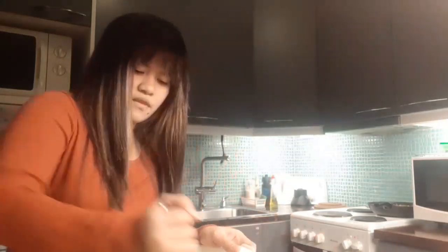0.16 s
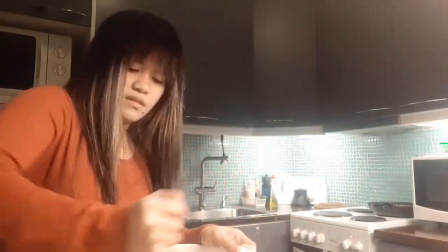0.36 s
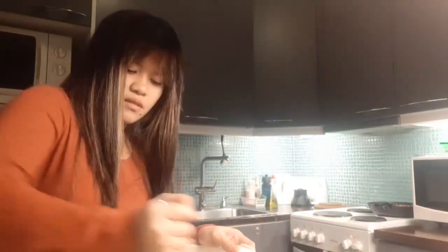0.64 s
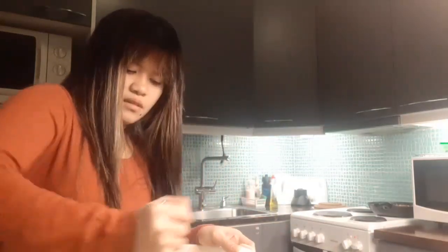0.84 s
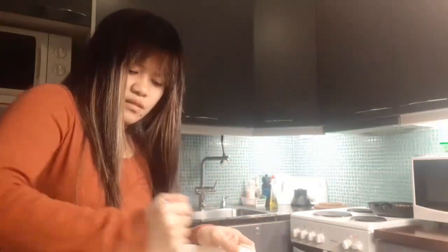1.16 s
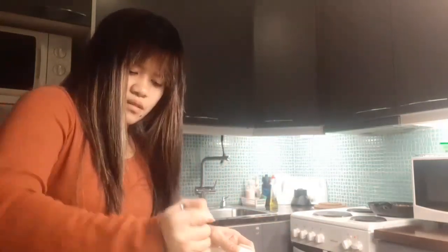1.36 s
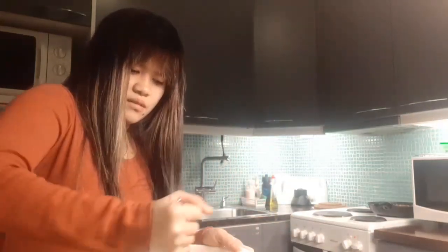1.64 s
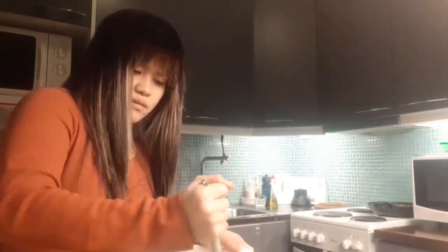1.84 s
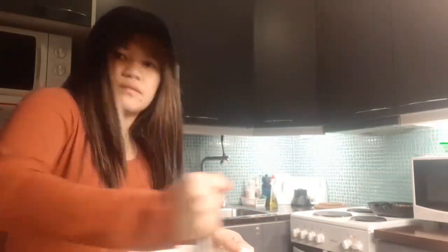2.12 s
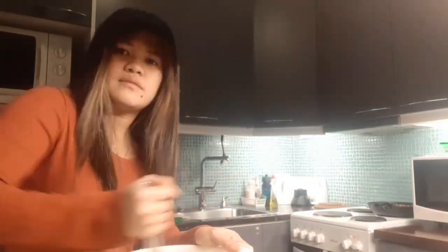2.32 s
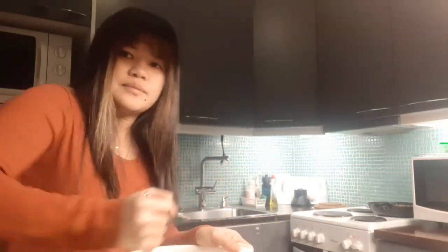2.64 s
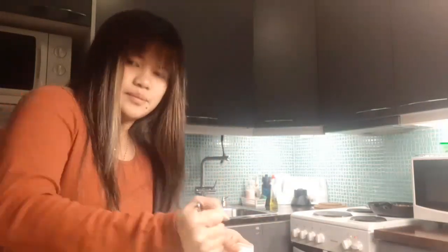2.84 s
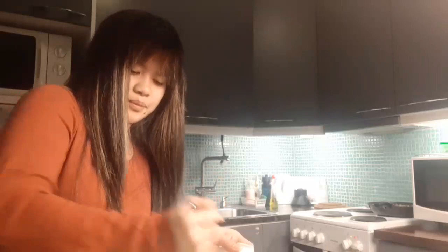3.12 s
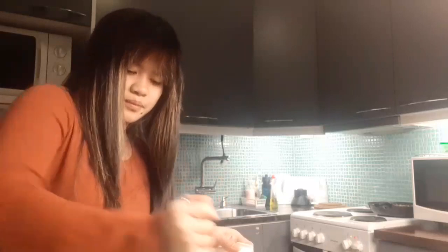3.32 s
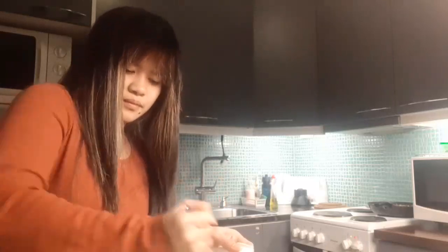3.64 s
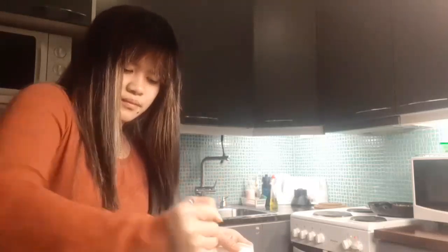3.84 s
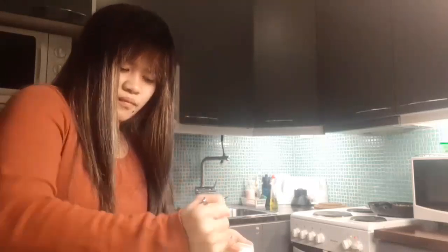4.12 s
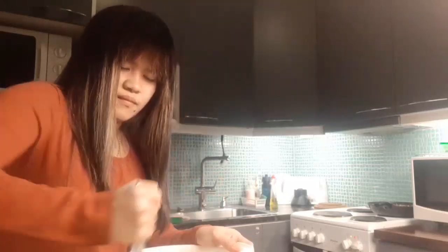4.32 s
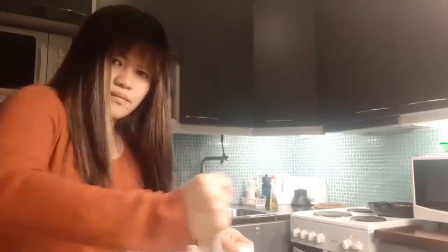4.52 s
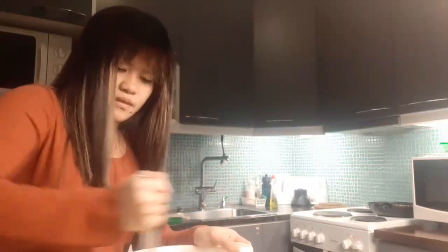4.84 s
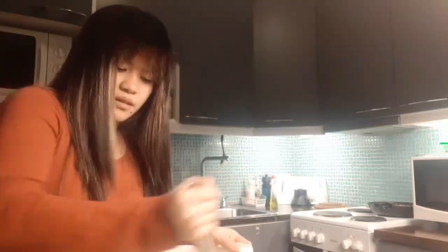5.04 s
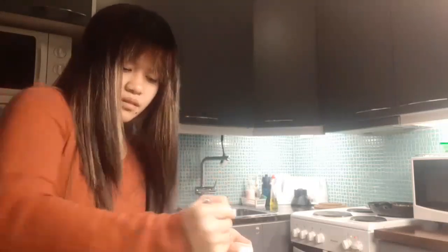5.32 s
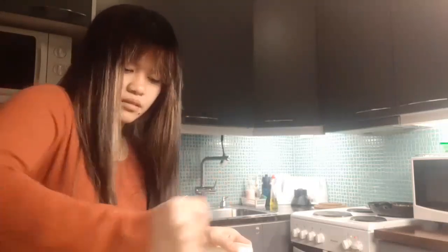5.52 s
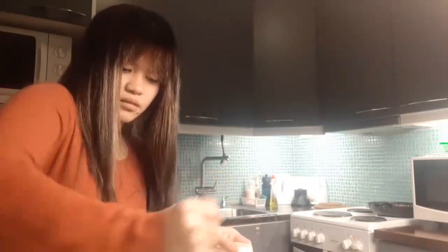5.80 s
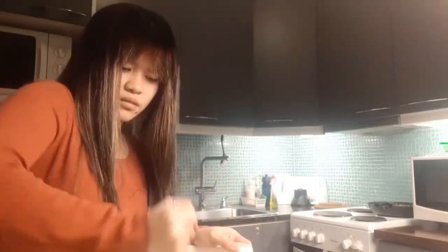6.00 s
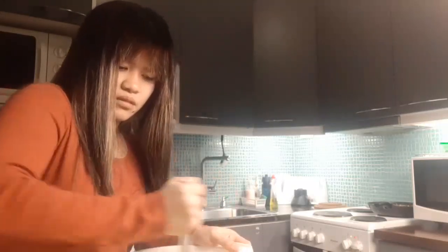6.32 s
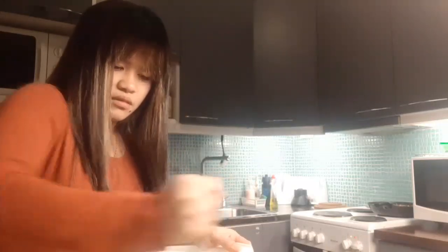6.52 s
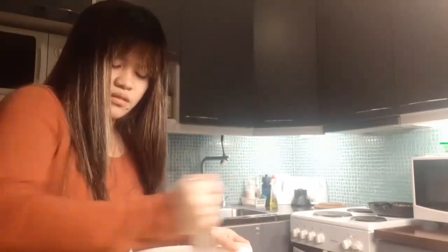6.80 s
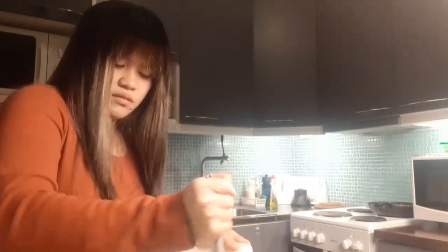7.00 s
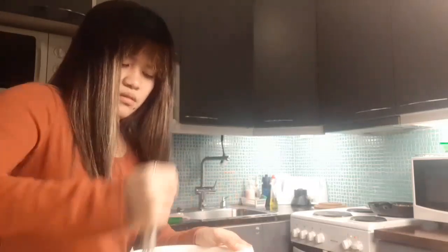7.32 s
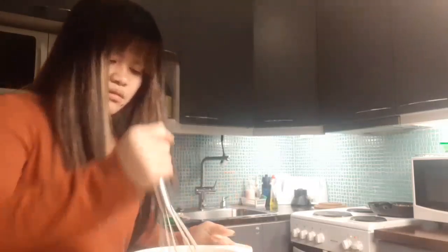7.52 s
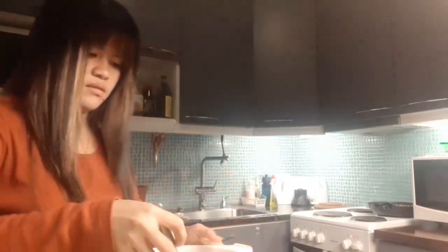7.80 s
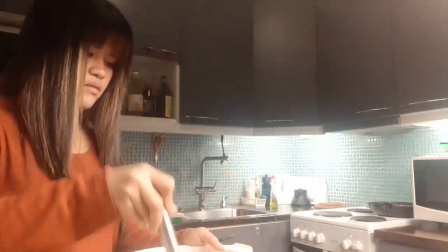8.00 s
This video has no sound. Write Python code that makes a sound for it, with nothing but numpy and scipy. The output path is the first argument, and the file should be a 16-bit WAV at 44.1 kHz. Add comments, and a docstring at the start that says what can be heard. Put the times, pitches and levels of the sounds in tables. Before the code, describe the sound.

Whisk wires scrape and slap a plastic bowl, quiet at first, then in sharper clattering bursts, the bowl thudding softly on the counter.

```python
"""A wire whisk beats batter in a plastic bowl: its wires scrape and slap the wall in clusters of ticks.
The bowl hums when knocked, its foot thumps the kitchen counter, and the lifted wires tremble faintly.
Ticks are short clicks with thin rings; hums and thumps are soft pushes that set dying sine notes going.
The small hard room answers with reflections lasting up to a third of a second, over a faint room tone.
Two small microphones pick it all up."""
import sys
import numpy as np
from scipy import signal
from scipy.fft import rfft, irfft
from scipy.io import wavfile
from scipy.ndimage import uniform_filter1d, map_coordinates

SR = 44100
rng = np.random.default_rng(int(sys.argv[2]) if len(sys.argv) > 2 else 0)


def wav_out(sig):
    """Save sig, one row per channel (or a flat mono array), as 16-bit PCM at SR to the path in sys.argv[1]."""
    wavfile.write(sys.argv[1], SR, np.round(np.clip(np.atleast_2d(sig).T, -1, 1) * 32767).astype(np.int16))


N = 359415  # length [samples]


def scraping():
    """Wires drag over the wall: dense random ticks, sounding on spots of the wall that keep changing."""
    ticks = grit(per_s=1100, spread_db=1.0)
    ticks = ticks + 0.5 * grit(per_s=230, spread_db=2.0)  # now and then a wire catches
    one_tick = tick()
    spots_hz = [hz for hz, _, _ in WIRE_RINGS[:6]]
    drag = np.zeros(N)
    for hz, share in zip(spots_hz, turns(count=6, per_s=15, sharp_db=20.5)):
        tick_on_spot = one_tick + 0.99 * spot(hz, cycles=18.2)
        drag += signal.oaconvolve(ticks * share, tick_on_spot)[:N]
    return evened(drag) * sweeps()


# sweeps of the whisk along the wall, levels before mixing:
# (fastest moment [s], scrape level [dB], swell time [s], fade time [s])
WHISK_SWEEPS = [(.03, -50, 0.2, 0.25), (0.158, -50.5, 0.15, 0.25), (.41, -51, 0.19, 0.29),
                (0.668, -45.5, 0.18, 0.13), (.87, -54.5, 0.13, 0.47), (1.06, -53.5, 0.081, 0.16),
                (1.168, -47.5, 0.041, 0.041), (1.31, -50, 0.13, 0.11), (1.41, -54, 0.051, 0.069),
                (1.509, -58, 0.037, 0.02), (1.715, -51, 0.015, 0.053), (1.788, -43.5, 0.071, 0.13),
                (1.9, -62, 0.11, 0.091), (2.049, -40, 0.056, 0.035), (2.198, -47, 0.41, 0.26),
                (2.36, -50.5, 0.087, .1), (2.43, -37, 0.061, 0.19), (2.83, -46, 0.31, 0.018),
                (3.11, -52.5, 0.44, 0.14), (3.34, -48.5, 0.1, 0.1), (3.63, -52.5, 0.41, 0.15),
                (3.802, -51.5, 0.14, 0.2), (4.12, -48.5, 0.17, 0.068), (4.481, -53, 0.52, 0.072),
                (4.619, -46, 0.039, 0.084), (4.699, -44, 0.063, 0.15), (4.92, -46, 0.14, 0.048),
                (5.03, -46, 0.046, 0.25), (5.319, -41.5, 0.11, 0.061), (5.59, -50, 0.4, 0.17),
                (5.848, -46, 0.15, 0.12), (6.158, -39, 0.096, 0.11), (6.4, -49.5, 0.091, 0.6),
                (6.52, -51, 0.051, 0.046), (6.596, -36, 0.022, 0.032), (6.8, -50, 0.12, 0.13),
                (7.058, -45, 0.096, 0.11), (7.411, -69, 0.13, 0.15), (7.812, -77.5, 0.41, .1),
                (8.06, -47.5, 0.0094, 0.074), (8.15, -34.5, 0.042, 0.036)]
SWEEP_DEPTH_DB = 16.5  # gained during the swell, lost during the fade


def sweeps():
    """Loudness of the scrape: each sweep swells up to its fastest moment and fades; neighbours overlap."""
    t = np.arange(0, N + 64, 64) / SR
    s, db, swell, fade = np.transpose(WHISK_SWEEPS)[:, :, None]
    before = (s - t) / np.maximum(swell, .005)
    after = (t - s) / np.maximum(fade, .005)
    away = np.where(t < s, before, after)
    loudness = np.linalg.norm(gain_of(db - SWEEP_DEPTH_DB * away), axis=0)
    return np.interp(np.arange(N) / SR, t, loudness)


# colour of the bare click: (frequency [Hz], relative level per Hz [dB])
CLICK_COLOUR = [(380, -41.5), (560, 0.5), (900, -7.5), (1500, -1), (2400, -3.5), (3800, 1.5), (5000, -5),
                (6800, -2.5), (8000, -8), (12000, -10), (14500, -19.5), (16000, -47.5)]
# wall and wires ringing after a tick: (frequency [Hz], relative level [dB], time to die by 60 dB [s])
WIRE_RINGS = [(1650, 9.5, 0.018), (2263, 1, 0.19), (1400, 1.5, 0.28), (2900, -6.5, .03),
              (3720, -10.5, 0.045), (5120, -18.5, 0.034), (6200, -8.5, 0.012), (6800, -4, .04)]


def tick():
    """One wire meets the wall: a click that starts at once and dies quickly, plus thin rings."""
    hz = abs(np.fft.fftfreq(4096, 1 / SR))
    log_gain = np.log(gain_of(np.maximum(read(CLICK_COLOUR, hz), -100)))
    # this phase packs the click's energy at its start
    click = np.fft.ifft(np.exp(np.conj(signal.hilbert(log_gain)))).real
    click[2048:] = 0
    return click / np.linalg.norm(click) + gain_of(-14.0) * ring(WIRE_RINGS)


def grit(per_s, spread_db):
    """Random knocks of either sign, a few of them large."""
    chance, sign, size = rng.random(N), rng.choice([-1., 1.], N), rng.exponential(1, N)
    return sign * gain_of(spread_db * np.minimum(size, 4)) * (chance < per_s / SR)


def spot(hz, cycles):
    """The short note of one spot of the wall: a dying sine smeared by itself, so it swells in softly."""
    note = ring([(hz, 0, cycles / hz)])[:1200]
    note = np.convolve(note, note)
    return np.pad(note / np.linalg.norm(note), (0, 4096 - len(note)))


# slaps of the wires on the wall, levels before mixing: (centre [s], loudest level [dB], note of the spot [Hz],
# note against tick [dB], half length of the tick cluster [s], at least 0.0015 s is used)
WALL_SLAPS = [(0.0453, -42.5, 4060, -19, 0.0042), (0.168, -37, 1430, -7, 0.0035),
              (0.333, -44, 3900, -28, 0.0036), (0.3992, -44, 2540, 4, 0.013), (0.551, -47, 3530, 1, 0.0026),
              (0.651, -49, 2500, -17, 0.025), (0.75, -44, 1780, 1, 0.0027), (0.827, -46, 2050, 2, 0.0042),
              (0.87, -40, 2450, -1, 0.0037), (0.923, -44, 2000, 7, 0.0039),
              (1.0237, -40.5, 2240, 13, 0.0047), (1.062, -44.5, 2520, 3, 0.0024),
              (1.154, -38.5, 1520, 2, .0013), (1.2935, -42, 1490, -2, 0.0057),
              (1.3612, -40.5, 2620, 8, 0.0017), (1.714, -48, 3580, 6, 0.0012),
              (1.767, -47, 1480, 8, 0.0022), (1.8164, -27, 1650, -3, 0.0041), (1.826, -26, 1580, -2, 0.013),
              (1.839, -30, 3200, -0.5, 0.0043), (2.02, -39, 3740, -15, 0.011),
              (2.0342, -23.5, 3670, -16, 0.0035), (2.1213, -38, 2100, -7, 0.0043),
              (2.1928, -38.5, 2450, -2, 0.0028), (2.2683, -30.5, 2450, 0, 0.00079),
              (2.295, -38.5, 2460, 7, 0.0015), (2.412, -28.5, 1510, -6, 0.0078),
              (2.4228, -20.5, 1350, -9.5, 0.00075), (2.4319, -25, 1440, -7, 0.0044),
              (2.457, -35.5, 6510, 22, 0.013), (2.507, -32.5, 1300, -6, 0.008),
              (2.6014, -42, 3720, -11, 0.0036), (2.823, -43, 1590, 0, 0.0059),
              (3.021, -44.5, 1580, 2, 0.0042), (3.092, -39, 3970, 0, .001), (3.384, -43, 1540, 0, 0.0034),
              (3.588, -44, 2310, 6.5, 0.0066), (3.784, -42.5, 1070, 4, 0.0051),
              (3.799, -42.5, 2210, 10, 0.003), (3.875, -43, 1690, 12, .004),
              (3.893, -46.5, 1480, 6, 0.0038), (3.995, -47.5, 1020, 7, 0.018),
              (4.029, -38.5, 1490, 8.5, 0.0037), (4.1094, -39.5, 2930, -0.5, 0.0062),
              (4.613, -45, 2200, 18, 0.0017), (4.634, -55, 3000, 15, .0015),
              (4.6762, -35.5, 4170, 24, 0.0014), (4.6929, -38, 3400, -18, 0.0012),
              (4.7351, -38.5, 5200, -7, 0.0083), (4.9209, -30, 3160, 6, 0.002),
              (4.934, -29, 1400, -8.5, 0.0016), (5.01, -42, 5000, 0, .0015),
              (5.0199, -32, 1530, -7.5, 0.0058), (5.04, -35, 7300, 20, 0.0029),
              (5.097, -46, 1970, -15, 0.0081), (5.323, -42, 3000, 2, .017),
              (5.514, -43.5, 2160, -13, 0.013), (5.5681, -45, 4020, 1, 0.0059),
              (5.589, -45, 2520, 1, 0.017), (5.7472, -45, 1400, 6, 0.0042), (5.88, -42.5, 2720, 6, 0.0034),
              (6.069, -43, 2000, 0.5, 0.0082), (6.15, -27.5, 1670, 2, 0.0066),
              (6.1668, -28.5, 3460, -9, 0.0074), (6.2127, -39.5, 1580, 15, .0021),
              (6.391, -31, 1490, -4, 0.011), (6.401, -37.5, 4220, 14, 0.0043),
              (6.598, -34.5, 2470, 19, 0.00074), (6.8159, -30, 1660, 1.5, 0.0051),
              (7.027, -39.5, 2190, -21, 0.0082), (7.046, -26.5, 1650, -2, 0.0035),
              (7.1586, -46.5, 2880, -0.5, 0.01), (7.399, -60, 1330, -1, 0.005),
              (7.627, -46.5, 1450, 4.5, 0.0079), (8.035, -30.5, 5650, 3, 0.00094),
              (8.0925, -42, 2020, 10, 0.0022), (8.14, -31, 2900, -2, 0.0074)]
SLAP_DULL = .2  # batter softens the slap's treble [0-1]
CLATTER_DB = -1.  # wire notes against the ticks; each loop rings one wire note


def slaps():
    """The loops of the whisk land one after another: a cluster of ticks swells in, then falls away."""
    wires, t = np.zeros(N), np.arange(-1600, 1600) / SR
    dull_tick = signal.lfilter([1 - SLAP_DULL], [1, -SLAP_DULL], tick())
    draws = rng.random((len(WALL_SLAPS), 4, len(t)))
    loops = [spot(hz, cycles=15.8) for hz, _, _ in WIRE_RINGS[:6]]
    for (s, db, hz, note_db, half), (chance, sign, size, which) in zip(WALL_SLAPS, draws):
        u = t / max(half, .0015)
        shape = np.where(u < 0, np.clip(1 + u / 1.5, 0, 1), np.exp(-.8 * u ** 2))
        strength = .7 * (chance < .3) + (1.5 + size) * (chance < .04)  # many light ticks, few strong ones
        knocks = np.sign(sign - .5) * shape * strength
        loop_number = np.floor(which * len(loops))
        clatter = sum(signal.fftconvolve(knocks * (loop_number == k), loop) for k, loop in enumerate(loops))
        ticks = evened(signal.fftconvolve(knocks, dull_tick))
        note = evened(signal.fftconvolve(knocks, spot(hz, cycles=8)))
        sound = ticks + gain_of(note_db) * note + gain_of(CLATTER_DB) * evened(clatter)
        loudest = np.sqrt(uniform_filter1d(sound ** 2, size=200).max())
        add(wires, s + t[0], gain_of(db) * sound / loudest)
    return wires


# the bowl rocks under the whisk, levels before mixing: (time [s], bowl hum level [dB], counter rumble level [dB])
BOWL_ROCKING = [(0., -64.5, -71), (.12, -63.5, -60), (.19, -59, -65), (.59, -60.5, -54.5),
                (1.38, -57, -53.5), (1.68, -102, -82), (1.989, -73.5, -76), (2.27, -103.5, -57.5),
                (2.37, -78, -69), (2.75, -63, -61.5), (3.93, -59.5, -52.5), (4.03, -49.5, -53),
                (4.56, -85.5, -74.5), (4.73, -82.5, -58), (5.2, -64, -67), (6.06, -59.5, -53.5),
                (6.37, -72, -62.5), (6.98, -89.5, -86), (7.3, -100, -83.5), (7.398, -100, -61.5),
                (7.61, -94.5, -84), (7.64, -79, -55.5), (8.01, -99, -81), (8.08, -86, -76)]
# notes of the bowl: (frequency [Hz], relative level [dB], time to die by 60 dB [s])
BOWL_NOTES = [(565, 5.5, 0.21), (656, 14.5, 0.064), (770, 23.5, 0.017), (1130, -8, 0.0077), (930, 9, 0.02),
              (1389, 9, 0.35)]
# notes of the counter: (frequency [Hz], relative level [dB], time to die by 60 dB [s])
COUNTER_NOTES = [(93, -3.5, 0.17), (125, 12, 0.032), (209.2, 3, 0.057), (316, -14, 0.044)]


def rocking():
    """Many soft random shoves keep the bowl humming and the counter rumbling."""
    t = np.arange(N) / SR
    s, hum_db, rumble_db = np.transpose(BOWL_ROCKING)
    soft = np.hanning(50)  # batter cushions the shoves to about a millisecond
    bowl_shoves = grit(per_s=620, spread_db=6.0)
    hum = evened(signal.oaconvolve(bowl_shoves, np.convolve(soft, ring(BOWL_NOTES)))[:N])
    counter_shoves = grit(per_s=200, spread_db=4.5)
    rumble = evened(signal.oaconvolve(counter_shoves, np.convolve(soft, ring(COUNTER_NOTES)))[:N])
    return hum * gain_of(np.interp(t, s, hum_db)) + rumble * gain_of(np.interp(t, s, rumble_db))


# knocks that set the bowl humming, levels before mixing: (time [s], peak level [dB], leading note [Hz])
BOWL_KNOCKS = [(.127, -48.5, 620), (.167, -38, 740), (.27, -45.5, 695), (.635, -41.5, 698),
               (.682, -47, 620), (.747, -41, 733), (.868, -40.5, 536), (.982, -45, 715),
               (1.024, -30.5, 627), (1.059, -48, 690), (1.149, -44, 754), (1.213, -44, 610),
               (1.294, -43.5, 585), (1.34, -61, 660), (1.821, -32.5, 691), (2.034, -44.5, 579),
               (2.192, -43, 780), (2.44, -39.5, 505), (3.108, -41.5, 587), (3.209, -49.5, 635),
               (3.457, -48, 656), (3.707, -43.5, 673), (3.734, -41, 580), (3.759, -45, 635),
               (3.781, -37, 726), (3.83, -43, 680), (3.954, -47, 613), (3.992, -34.5, 682),
               (4.036, -43.5, 537), (5.018, -44, 533), (5.584, -40, 667), (5.841, -42.5, 616),
               (5.982, -48, 605), (6.025, -40, 770), (6.036, -31.5, 715), (6.072, -37, 556),
               (6.15, -24, 668), (6.389, -32.5, 592), (6.588, -45, 672), (6.815, -31.5, 651),
               (7.044, -37.5, 596), (7.626, -38, 573), (8.134, -37.5, 612)]


def bowl_knocks():
    """Single knocks with a slightly hard edge make the bowl hum."""
    return blows(BOWL_KNOCKS, BOWL_NOTES, cycles=3.48, t60=0.07, lead_s=0.002947, edge=0.28)


# bowl foot rocking on the counter, levels before mixing: (time [s], peak level [dB], pitch [Hz])
FOOT_THUMPS = [(.169, -31, 211), (.223, -33, 208), (.328, -44, 119), (.402, -38.5, 95.5), (.434, -40, 150),
               (.474, -38, 165), (.506, -38.5, 195), (.632, -37, 90), (.795, -45.5, 122), (.92, -34.5, 110),
               (1.021, -43, 138), (1.148, -37, 92.5), (1.212, -43, 240), (1.335, -49, 222),
               (2.199, -48.5, 88.8), (2.271, -41.5, 105), (2.578, -43.5, 80.6), (2.831, -48.5, 106),
               (2.906, -48, 97.5), (3.11, -45, 148), (3.379, -41, 144), (3.413, -46, 135),
               (3.573, -43.5, 88.5), (3.612, -41, 88), (3.743, -40.5, 194), (3.824, -55, 93),
               (3.992, -31.5, 261), (4.296, -43.5, 109), (4.679, -45.5, 100), (4.771, -43, 116),
               (5.316, -42, 204), (5.508, -40, 149), (5.58, -39, 116), (5.621, -44.5, 109),
               (5.687, -53, 108), (5.833, -40, 108), (5.874, -41, 96), (6.034, -42.5, 202),
               (6.154, -44, 129), (6.226, -31.5, 155), (6.661, -47.5, 118), (7.038, -49.5, 134),
               (7.339, -41, 90), (7.395, -49, 205), (7.621, -26.5, 132), (8.038, -45, 128)]


def foot_thumps():
    """The bowl's foot thuds softly on the counter, a few milliseconds after each listed time."""
    return blows(FOOT_THUMPS, COUNTER_NOTES, cycles=0.58, t60=0.019, lead_s=-0.0042, edge=0)


def blows(table, modes, cycles, t60, lead_s, edge):
    """Soft pushes set a body ringing, with an extra ring at the pushed note; a hard edge wakes upper notes."""
    out, t = np.zeros(N), np.arange(1500) / SR
    for s, db, hz in table:
        u = t * hz / cycles
        push = np.sin(2 * np.pi * hz * t) * u ** 1.78 * np.exp(-3.0 * u)
        push[round(lead_s * SR):][:12] += edge * np.hanning(12)
        sound = signal.fftconvolve(push, ring(modes + [(hz, 4, t60)]))
        add(out, s - lead_s, gain_of(db) * sound / abs(sound).max())
    return out


# the lifted wires tremble faintly, level before mixing: (start [s], length [s], note [Hz], level [dB])
WIRE_TREMBLE = (7.28, .38, 960, -85.5)


def tremble():
    """A thin note whose strength and phase waver at random."""
    s, length, hz, db = WIRE_TREMBLE
    out, t = np.zeros(N), np.arange(0, length, 1 / SR)
    waver = evened(uniform_filter1d(rng.standard_normal((2, SR)), size=500))[:, :len(t)]
    note = waver[0] * np.cos(2 * np.pi * hz * t) + waver[1] * np.sin(2 * np.pi * hz * t)
    add(out, s, gain_of(db) * note * signal.windows.tukey(len(t), .3))
    return out


# how long the room rings: (frequency [Hz], time to die by 60 dB [s])
KITCHEN_DECAY = [(100, 0.18), (700, 0.32), (1840, 0.25), (4850, 0.25), (12000, 0.22)]


def kitchen(x, alike):
    """Sparse reflections of random sign, each band dying at its own speed; alike = share common to both sides.
    As the whisk moves, the sound passes among three patterns of reflections."""
    at, out = np.arange(100, SR // 2 - 20, 20), 0
    for share in turns(count=3, per_s=13, sharp_db=52.5):
        taps = np.zeros((2, SR // 2))
        places = at + rng.integers(0, 20, (2, len(at)))
        np.put_along_axis(taps, places, rng.choice([-1., 1.], (2, len(at))), 1)
        hz, t, z = signal.stft(taps, SR, nperseg=256)
        same = np.clip(read(alike, hz), 0, 1)[:, None]
        z = np.array([z[0], same * z[0] + np.sqrt(1 - same ** 2) * z[1]])
        decay = gain_of(-60 * t / read(KITCHEN_DECAY, hz)[:, None])
        tail = signal.istft(z * decay, SR, nperseg=256)[1]
        tail = tail / np.linalg.norm(tail[0])
        out = out + signal.oaconvolve((x * share)[None], tail, axes=1)[:, :N]
    return out


# colour of the room tone: (frequency [Hz], relative level per Hz [dB])
HUSH_COLOUR = [(40, -27.5), (108, -3.5), (225, -30), (500, -49), (1050, -52.5), (7000, -31.5),
               (15500, -42.5)]
HUSH_DB = -76  # average level of the room tone


def hush():
    """Faint steady room tone: coloured noise, mostly shared by both microphones in the bass."""
    a, b = rfft(rng.standard_normal((2, N)))
    hz = np.fft.rfftfreq(N, 1 / SR)
    same = np.clip(read([(100, 0.75), (1000, 0.27)], hz), 0, 1)  # (frequency [Hz], shared part [0-1])
    both = np.array([a, same * a + np.sqrt(1 - same ** 2) * b])
    return gain_of(HUSH_DB) * evened(irfft(both * gain_of(read(HUSH_COLOUR, hz)), N))


def turns(count, per_s, sharp_db):
    """Slowly wandering shares whose squares add up to about 1."""
    noise = rng.standard_normal((count, N // 256 + 2))  # one value every 256 samples
    x = gain_of(sharp_db * evened(uniform_filter1d(noise, round(SR / 256 / per_s))))
    x /= np.linalg.norm(x, axis=0)
    return [np.interp(np.arange(N) / 256, np.arange(len(v)), v) for v in x]


def ring(modes):
    """Dying sines of a struck body, scaled to energy 1."""
    t = np.arange(4096) / SR
    x = sum(gain_of(db - 60 * t / t60) * np.sin(2 * np.pi * hz * t) for hz, db, t60 in modes)
    x = x * np.hanning(2 * len(t))[len(t):]  # no ring ends with a step
    return x / np.linalg.norm(x)


def gain_of(db):
    """Decibels to amplitude."""
    return 10 ** (np.asarray(db) / 20)


def evened(x):
    """Scales to an average (rms) level of 1."""
    return x / np.sqrt(np.mean(x ** 2) + 1e-20)


def read(points, hz):
    """Reads a table between its points, along log frequency."""
    f, value = np.transpose(points)
    return np.interp(np.log(hz + 1), np.log(f + 1), value)


def add(mix, s, sound):
    """Lays a sound into the mix at time s."""
    part = mix[round(s * SR):][:len(sound)]
    part += sound[:len(part)]


# part of the bass reflections common to both sides: (frequency [Hz], share [0-1])
SHARED_BASS = [(150, 0.98), (400, 0)]
# part of the wire reflections common to both sides: (frequency [Hz], share [0-1])
SHARED_WIRES = [(500, 0.5), (1000, 0), (4000, 0.)]
LEFT_LAG_S = 0.000453  # with the whisk at the far right of the bowl


def scene():
    """Bright wire sound reaches the right side first, by a lead that wanders; the bass arrives alike."""
    bright = scraping() + slaps()
    low = rocking() + bowl_knocks() + foot_thumps() + tremble()
    rightward = turns(count=2, per_s=6, sharp_db=7.)[0] ** 4  # 0-1
    heard_at = np.arange(N) - rightward * LEFT_LAG_S * SR
    late = map_coordinates(bright, [heard_at], order=3, mode="nearest")
    direct = gain_of(-0.5) * np.array([late, bright]) + gain_of(2.0) * low
    wire_room = gain_of(-3.0) * kitchen(bright, SHARED_WIRES)
    bass_room = gain_of(-2.0) * kitchen(low, SHARED_BASS)
    return direct + wire_room + bass_room + hush()


# left microphone against right: (frequency [Hz], level difference [dB])
MICROPHONE_DIFFERENCE = [(300, -1.), (1100, 1.5), (2200, -0.1), (4000, -0.5), (8000, -1.5), (13000, -0.5)]
EDGE_HZ = 15770  # treble above this is cut


def record(dry):
    """Small microphones lose the deep bass and differ a little in colour; then the recorder's band limit."""
    thin = signal.sosfilt(signal.butter(3, 74, "high", fs=SR, output="sos"), dry)
    lean_db = read(MICROPHONE_DIFFERENCE, np.fft.rfftfreq(N, 1 / SR)) / 2  # half to each side
    thin = irfft(rfft(thin) * gain_of([lean_db, -lean_db]), N)
    band_limit = signal.firwin(511, EDGE_HZ, window=("kaiser", 9), fs=SR)
    return signal.oaconvolve(thin, band_limit[None], "same")


dry = scene()
out = record(dry)
wav_out(out)
```